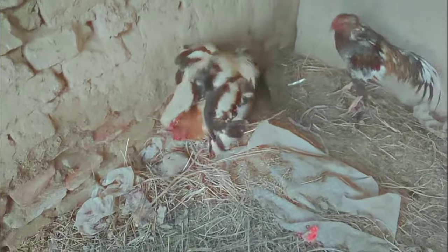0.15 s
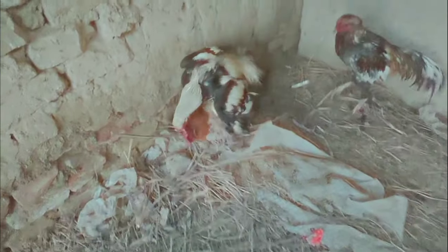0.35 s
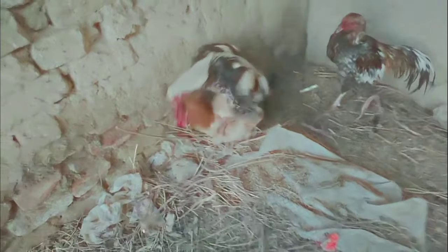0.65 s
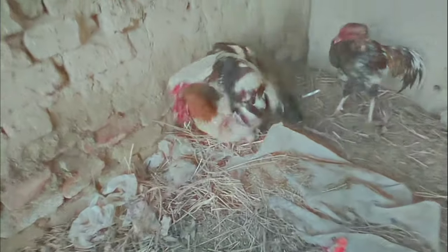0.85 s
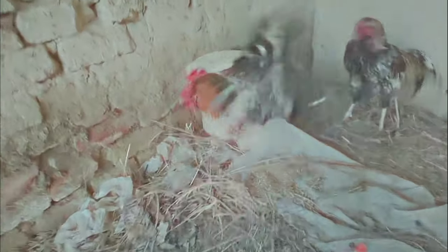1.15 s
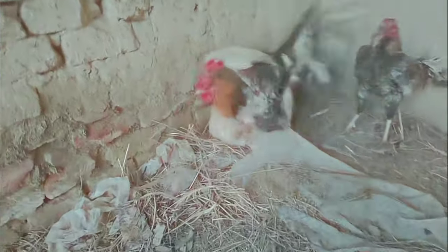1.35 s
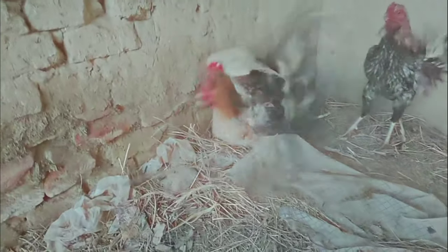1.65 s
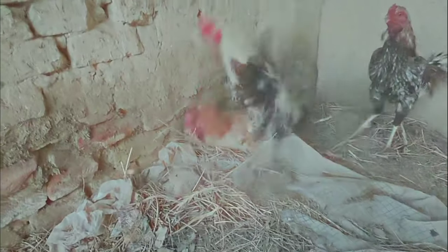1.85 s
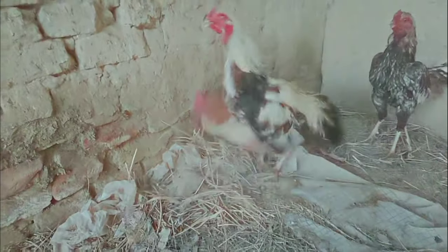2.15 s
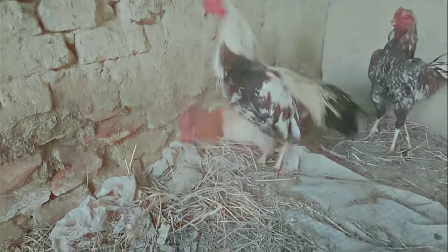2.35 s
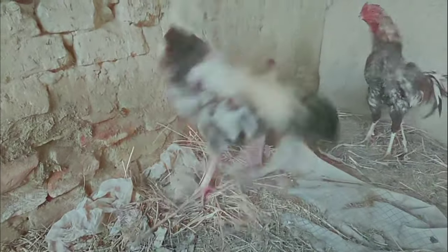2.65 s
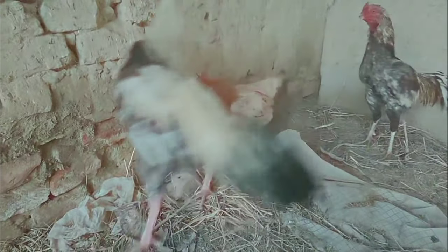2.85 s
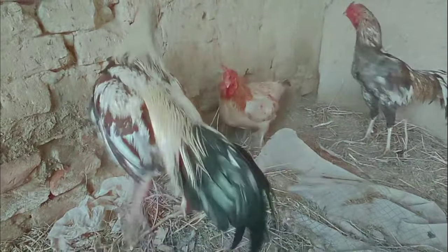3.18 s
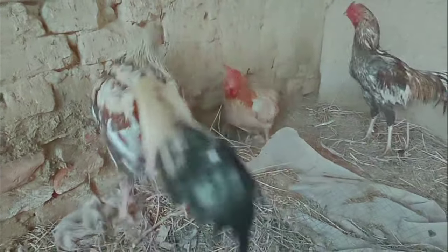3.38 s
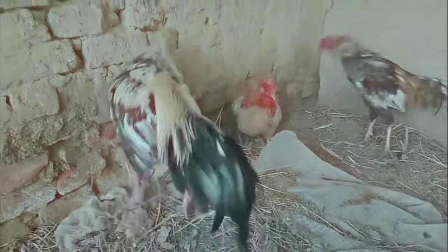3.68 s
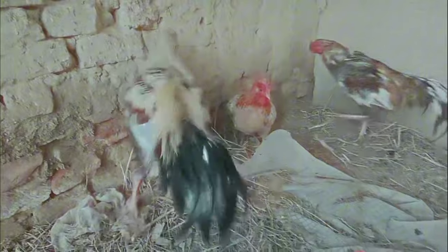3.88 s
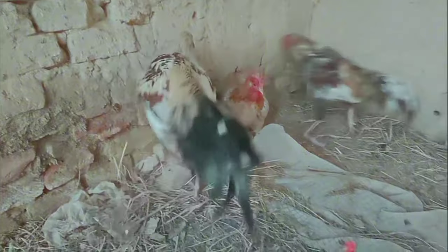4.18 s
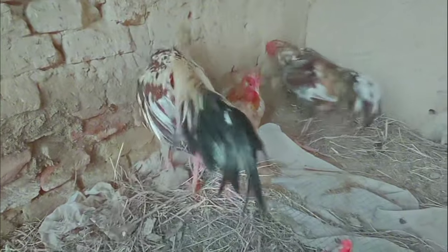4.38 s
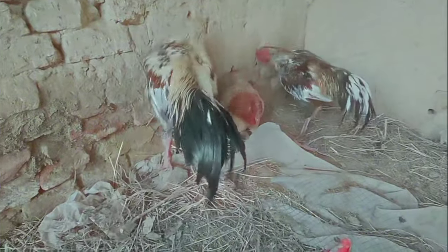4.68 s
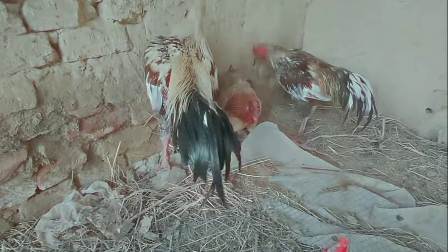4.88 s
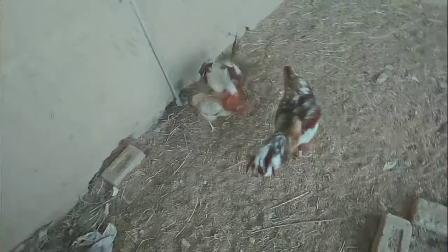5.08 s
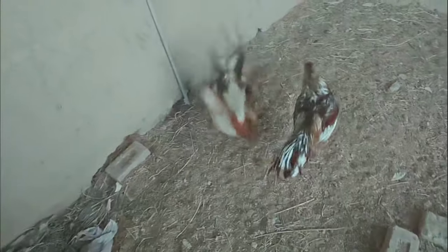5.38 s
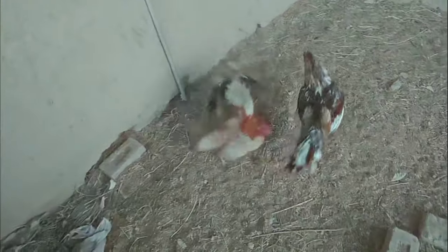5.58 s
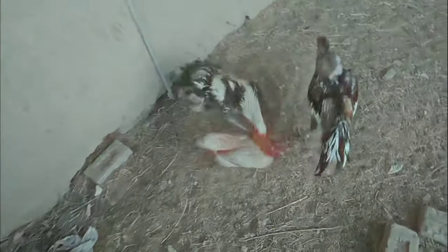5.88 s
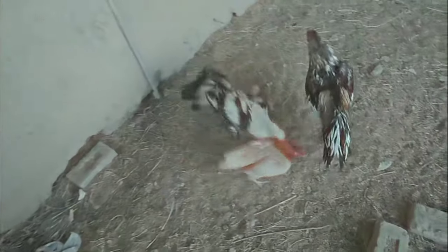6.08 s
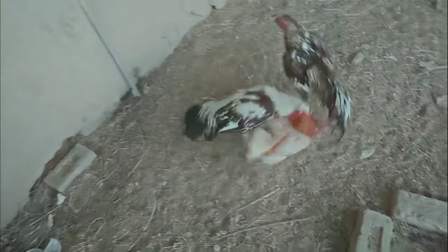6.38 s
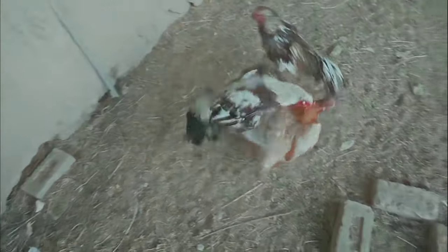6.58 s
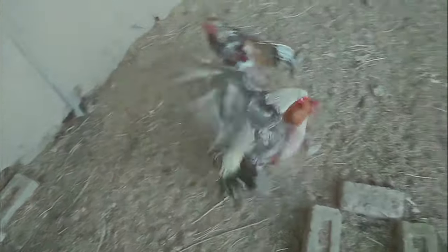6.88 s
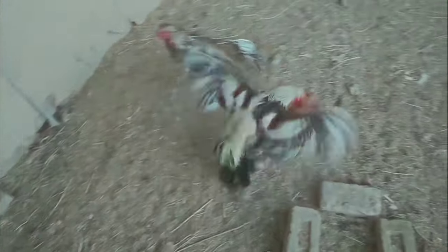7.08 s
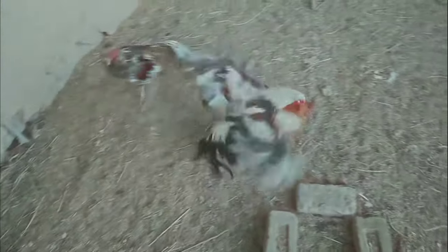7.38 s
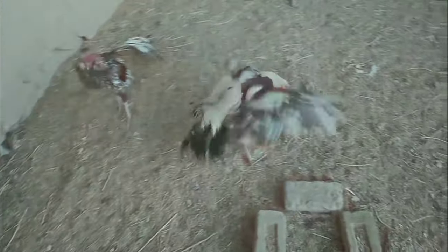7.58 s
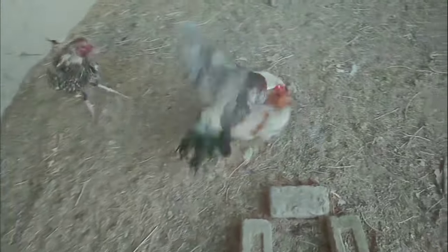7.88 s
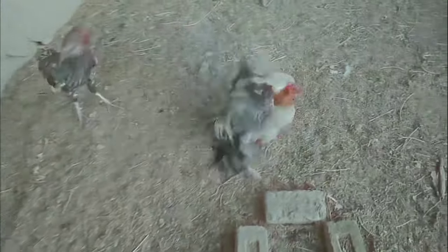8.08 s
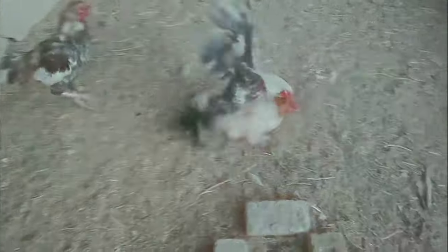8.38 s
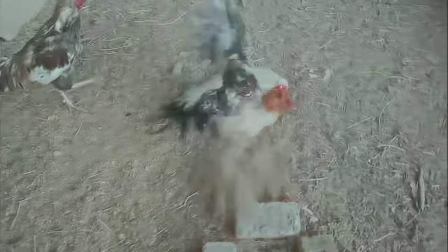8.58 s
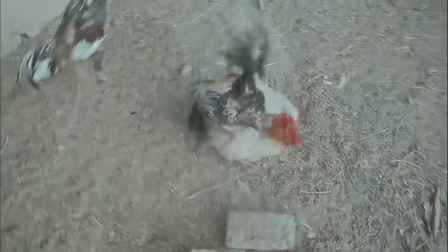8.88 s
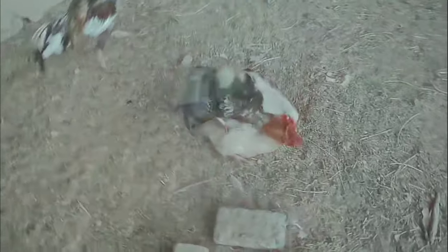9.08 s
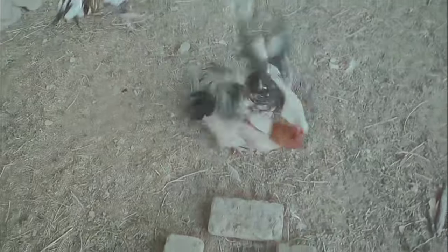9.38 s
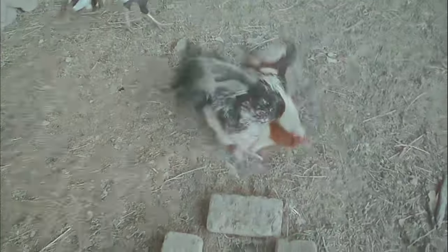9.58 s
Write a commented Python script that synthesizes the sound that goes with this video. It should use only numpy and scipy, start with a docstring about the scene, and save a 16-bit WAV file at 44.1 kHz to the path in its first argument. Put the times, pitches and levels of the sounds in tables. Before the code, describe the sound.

Chickens scuffle in straw with wing slaps and low clucks, followed by a hen's harsh squawks and more flapping.

```python
"""A rooster treads a hen on straw and sacking in a walled pen, then clucks and croons.
After a short silence a hen squawks and cries under beating wings in a bare yard.
The voices are shaky harmonics shaped by throat and beak; the hen's break into period doubling.
Straw and feathers are crackling noise, landings are low thuds, and something hollow is knocked.
A small microphone with a sharp treble resonance colours every rustle."""
import sys
import numpy as np
from scipy import signal
from scipy.fft import rfft, irfft, next_fast_len
from scipy.io import wavfile
from scipy.ndimage import uniform_filter1d

SR = 44100
rng = np.random.default_rng(int(sys.argv[2]) if len(sys.argv) > 2 else 0)


def transcribe(u):
    """Save the signal u as a 16-bit wav file named by the first command-line argument.

    u: samples, shape (n,) or (channels, n), limited to [-1, 1]; the rate is SR.
    q: integer samples, one column per channel.
    """
    v = np.clip(np.atleast_2d(u).T, -1, 1)
    q = np.round(v * 32767).astype(np.int16)
    wavfile.write(sys.argv[1], SR, q)


N = 429534
PEN_END_S, YARD_START_S = 4.972, 5.134

# The tone of straw and feathers. Each row: frequency in Hz, level in dB.
RUSTLE_SPECTRUM = [(120, -19.5), (200, -12), (800, -8.5), (1500, -9.5), (2500, -9), (4000, -11),
                   (8000, -6.5), (16000, -15)]


def amp(db):
    """Decibels to gain."""
    return 10 ** (np.asarray(db) / 20)


def unit_rms(x):
    """Scales to rms 1."""
    return x / np.sqrt(np.mean(x ** 2) + 1e-20)


def curve_at(points, hz):
    """Reads a curve on a log-frequency axis."""
    f, value = np.transpose(points)
    return np.interp(np.log(hz + 1), np.log(f + 1), value)


def colour(x, spectrum):
    """Filters by a spectrum and scales to rms 1."""
    size = next_fast_len(len(x))
    gain = amp(curve_at(spectrum, np.fft.rfftfreq(size, 1 / SR)))
    return unit_rms(irfft(rfft(x, size) * gain, size)[:len(x)])


def wander(count, hz):
    """Smooth random drift of rms 1, up to about the given rate."""
    width = int(SR / hz / 2)
    return unit_rms(uniform_filter1d(uniform_filter1d(rng.standard_normal(count), width), width))


def envelopes(rows):
    """Turns breakpoints, led by their time in seconds, into one curve per column."""
    s, *values = np.transpose(rows)
    t = np.arange(s[0], s[-1], 1 / SR)
    return [np.interp(t, s, column) for column in values]


def swells(t, peak_s, db, rise_s, fall_s):
    """One rounded gain curve per event, 20 dB down at its rise and fall times."""
    age = t - peak_s[:, None]
    distance = np.where(age < 0, -age / np.reshape(rise_s, (-1, 1)), age / np.reshape(fall_s, (-1, 1)))
    return amp(db[:, None] - 20 * distance ** 1.4)


def mids(x):
    """The body of a rustle, under its hiss."""
    return signal.lfilter(*signal.butter(1, [250, 4000], "band", fs=SR), x)


def straw_crackle(grains_per_s=900):
    """Tiny scrapes over soft noise, fluttering in level."""
    grains = rng.standard_normal(N) * amp(0.89 * np.minimum(rng.exponential(1, N), 3))
    grains *= rng.random(N) < grains_per_s / SR
    scrape = rng.standard_normal(40) * np.exp(-np.arange(40) / 9)
    crackle = 0.53 * unit_rms(np.convolve(grains, scrape, "same")) + 0.9 * rng.standard_normal(N)
    return colour(crackle * amp(1.63 * wander(N, 54)), RUSTLE_SPECTRUM)


def scuffle():
    """Straw, sacking and feathers rustle, wings push lumpy low air, and one squawk gets its hiss."""
    # The steady shuffling. Each row: time in seconds, rustle in dB, low air in dB.
    shuffling = [(0, -60.5, -74), (.55, -65.5, -74), (1.15, -61, -63.5), (1.4, -48, -52.5),
                 (1.75, -51.5, -55), (2.2, -52, -61), (2.55, -72, -72), (3.1, -61.5, -84), (3.9, -66, -73),
                 (4.6, -65.5, -68), (4.78, -103, -78), (5.14, -56.5, -78.5), (6.3, -60, -69),
                 (6.85, -52.5, -64.5), (7.3, -52, -62), (8.4, -55, -59), (8.93, -61, -67.5),
                 (9.02, -69.5, -87), (9.3, -62.5, -62), (9.74, -69, -78)]
    # Swishes of feathers and sacking, and at 5.42 s the breathy hiss of the hen's squawk. Each row:
    # peak time in seconds, level in dB, rise and fall in seconds, body against treble in dB.
    swishes = [(.21, -66, 0.028, 0.088, -4), (.77, -64, 0.076, 0.015, -11), (1.07, -55, 0.035, 0.084, 4),
               (1.26, -51, .08, .08, 3), (1.44, -39, 0.056, 0.013, -5.5), (1.55, -47.5, 0.048, 0.064, -2),
               (1.688, -39.5, 0.025, 0.048, 2), (1.85, -52, 0.14, 0.028, 4.5),
               (2.099, -37, 0.014, .05, -0.5), (2.31, -50.5, 0.043, 0.38, 2.5),
               (2.65, -50, 0.036, 0.071, 2.5), (2.85, -49, 0.048, 0.077, -12), (2.94, -55.5, 0.02, 0.11, 4),
               (3.09, -57, 0.053, 0.058, -2), (3.2, -43.5, 0.15, 0.095, -9), (3.32, -39, 0.034, 0.049, -16),
               (3.385, -40, 0.069, 0.14, -9.5), (3.64, -43, 0.075, 0.044, -11), (3.8, -54, 0.11, .1, -15),
               (3.91, -51.5, 0.2, .12, -0.5), (4.085, -42, 0.061, 0.064, -10), (4.2, -55, 0.028, 0.035, -3),
               (4.32, -48, 0.078, 0.17, -4.5), (4.5, -54, .1, 0.16, -3), (4.64, -51.5, 0.098, 0.091, -3),
               (5.42, -34, 0.037, .05, -11), (5.535, -41, 0.027, 0.032, -1), (5.84, -56, 0.024, 0.017, -2),
               (6.07, -46, 0.08, 0.093, -18), (6.8, -69, .05, 0.041, -4), (6.92, -54, 0.014, .04, 11),
               (7.04, -46, 0.069, .04, 2), (7.34, -59, 0.022, .1, -3), (8.01, -52, 0.071, 0.074, -4.5),
               (8.12, -43.5, .02, 0.028, -11), (8.2, -56, 0.023, .1, -8), (8.49, -52, 0.036, 0.055, 5.5),
               (8.6, -53.5, .06, .06, 0), (8.86, -57.5, 0.055, 0.11, -11), (9.22, -54, 0.045, 0.16, -3.5),
               (9.43, -50, 0.032, 0.034, 2), (9.5, -53.5, 0.018, 0.11, -17)]
    # Pushes of air from the wings. Each row: peak time in seconds, level in dB.
    gusts = [(.21, -80), (.57, -69), (1.4, -52), (1.52, -53), (1.66, -59), (1.95, -54), (2.12, -62),
             (2.66, -64), (4.5, -66), (4.64, -68), (5.14, -54), (5.42, -51), (5.535, -53), (5.84, -62),
             (5.95, -59), (6.24, -48.5), (6.7, -58), (6.8, -60), (6.94, -50), (7.06, -49), (7.34, -65),
             (7.8, -72), (8.01, -56), (8.12, -56), (8.2, -69), (8.57, -52), (8.68, -56), (9.22, -67),
             (9.43, -59)]
    # The tone of that air. Each row: frequency in Hz, level in dB.
    air_spectrum = [(15, -43), (25, -16.5), (54, -0.5), (92, -5), (124, -2.5), (248, -7.5), (277, -10),
                    (500, -12), (650, -41.5), (1100, -120)]
    t = np.arange(0, N, 64) / SR
    s, rustle_db, air_db = np.transpose(shuffling)
    *swish_shape, body_db = np.transpose(swishes)
    bed = amp(np.interp(t, s, rustle_db))
    swish = swells(t, *swish_shape)
    treble = bed + swish.sum(axis=0)
    body = bed * amp(1.5) + amp(np.clip(body_db, -15, 10)) @ swish
    gust = swells(t, *np.transpose(gusts), rise_s=0.046, fall_s=0.07)
    low = amp(np.interp(t, s, air_db)) + gust.sum(axis=0)
    treble, body, low = (np.interp(np.arange(N) / SR, t, gain) for gain in (treble, body, low))
    rustle = straw_crackle()
    air = colour(rng.standard_normal(N) * amp(4 * wander(N, 16)), air_spectrum)
    return treble * rustle + (body - treble) * mids(rustle) + low * air


def hiss(level_db=-67):
    """A faint steady hiss with a soft low end."""
    # Its tone. Each row: frequency in Hz, level in dB.
    spectrum = [(18, -36), (30, -11.5), (80, -5), (226, -19), (540, -14.5), (1200, -26), (4000, -27.5),
                (16000, -24.5)]
    return amp(level_db) * colour(rng.standard_normal(N), spectrum)


def wing_slaps():
    """Bursts of feather and straw noise, each led by a dry snap."""
    # Slaps, scratches and snaps. Each row: time in seconds, level in dB, mids against treble in dB,
    # t60 in seconds, snap in dB.
    slaps = [(0.1989, -40.5, 10.5, 0.1, -3.5), (0.411, -49, 7, 0.091, -6), (1.1884, -34, 9.5, 0.063, -14),
             (1.3384, -28.5, 6.5, 0.12, -3), (1.4046, -24, 2.5, 0.056, -0.5), (1.428, -25, 2, 0.081, 0),
             (1.4711, -20, 2, 0.053, 1), (1.523, -25, 0, 0.21, -9), (1.5537, -29, -6, 0.083, 3),
             (1.6164, -30, 6.5, 0.057, -1), (1.664, -31, 5.5, 0.15, -11), (1.755, -33, 7, 0.098, -12),
             (1.9061, -29.5, 7, 0.083, -7), (2.0936, -21.5, 2.5, 0.1, -8), (2.6236, -40, 14, 0.08, -1),
             (2.8259, -24.5, -13, 0.13, -5), (3.5934, -29.5, -19, 0.076, 3), (3.8596, -38, 15.5, 0.052, -1),
             (4.0743, -28, -10, 0.17, -9), (5.5167, -23, -5, 0.075, -6), (6.9084, -25, 7, 0.088, -8),
             (7.319, -28.5, -1, 0.11, -5), (7.9922, -23, -2, 0.078, 7), (8.113, -21.5, 0, 0.062, -10),
             (8.1976, -25, -14, 0.15, -6), (8.2606, -28, -4, 0.067, 1), (8.3938, -27, -6.5, 0.085, 9),
             (8.53, -29, 6.5, 0.06, 3), (8.5753, -25, -19, 0.049, 9), (8.6496, -31, 0, 0.15, -8),
             (8.7638, -53, -13, 0.099, -6), (9.413, -29, 4.5, 0.086, -6), (9.4904, -40, -1, 0.22, -15)]
    t, snap_s = np.arange(round(.2 * SR)) / SR, .002
    for s, db, mids_db, t60, snap_db in slaps:
        burst = colour(rng.standard_normal(len(t)), RUSTLE_SPECTRUM)
        burst += (amp(mids_db) - 1) * mids(burst)
        decay = 0.32 * np.minimum(t / 0.0044, 1) * amp(-60 * t / t60)
        snap = 0.24 * amp(snap_db - 60 * abs(t - snap_s) / 0.0047)
        yield s - snap_s, amp(db) * burst * (decay + snap)


def hollow_knocks():
    """Something hollow is knocked: a few short modes start together."""
    # The knocks. Each row: start in seconds, peak in dB.
    knocks = [(0.2, -33.5), (0.413, -45), (0.562, -50), (0.914, -46.5), (1.058, -40.5)]
    # The hollow body's modes. Each row: frequency in Hz, level in dB, t60 in seconds.
    modes = [(330, -6, .04), (635, -4, .04), (970, -3, .045), (1383, -2, .05), (1570, -3, .05),
             (1803, -1, .045), (2450, -8, .04), (3000, -8, .04)]
    t = np.arange(round(.15 * SR)) / SR
    ring = sum(amp(db - 60 * t / t60) * np.sin(2 * np.pi * hz * t) for hz, db, t60 in modes)
    for s, db in knocks:
        yield s, amp(db) * ring / abs(ring).max()


def landing_thuds():
    """Feet and bodies land on earth: damped low pushes that sag in pitch."""
    # The landings. Each row: start in seconds, level in dB, nominal pitch in Hz, t60 in seconds.
    landings = [(1.339, -44, 96.9, 0.16), (1.369, -39, 132, 0.14), (2.09, -56, 192, 0.16),
                (6.226, -36.5, 118, 0.2), (6.898, -53, 130, 0.17), (7.6, -46.5, 180, 0.26),
                (8.522, -41.5, 214, 0.2), (8.657, -43, 109, 0.17)]
    t = np.arange(round(.3 * SR)) / SR
    attack = np.minimum(t / 0.0025, 1)
    for s, db, hz, t60 in landings:
        cycles = hz * (.8 * t + 0.011 * (1 - np.exp(-t / 0.012)))
        yield s, amp(db - 60 * t / t60) * np.sin(2 * np.pi * cycles) * attack


def harmonics(hz, jitter, throat, top_hz, tilt_db=0, flicker_db=4.5, flicker_hz=40,
              beak_hz=None, shares_db=None):
    """Harmonics of a shaky pitch, each weighted by throat and beak and flickering in strength."""
    cycles = np.cumsum(hz * (1 + jitter * wander(len(hz), 226))) / SR
    orders = np.arange(1, int(top_hz / hz.max()))[:, None]
    partial_hz = orders * hz
    db = curve_at(throat, partial_hz) + tilt_db * np.log2(partial_hz / 1500)
    if beak_hz is not None:
        db += 9 * np.exp(-(np.log2(partial_hz / beak_hz) / .3) ** 2)
    gain = amp(db + flicker_db * np.array([wander(len(hz), flicker_hz) for _ in orders]))
    gain /= np.sqrt((gain ** 2).sum(axis=0))
    if shares_db:  # the second partial and the top band get levels of their own
        second_db, high_db = shares_db
        high = gain * np.clip((partial_hz - 3000) / 300, 0, 1)
        gain = gain - high + high * amp(high_db) / np.sqrt((high ** 2).sum(axis=0))
        gain[1] = amp(second_db)
    return np.sqrt(2) * (gain * np.cos(2 * np.pi * orders * cycles + orders ** 2)).sum(axis=0)


def rooster_voice(rows, throat, hoarseness):
    """Low pulses through a nearly closed beak, shakier when hoarse."""
    effort_db, hz = envelopes(rows)
    voice = harmonics(hz, 0.194 * hoarseness, throat, top_hz=4000, flicker_hz=30)
    return amp(effort_db) * voice * signal.windows.tukey(len(hz), .06)


def sharp_clucks():
    """The rooster's voice swells and dies quickly, bending up as it fades."""
    # The clucks. Each row: start, rise and fall in seconds, peak effort in dB, pitch in Hz.
    clucks = [(2.308, 0.029, .085, -35.5, 310), (2.385, 0.033, 0.036, -40, 334.3),
              (2.605, 0.026, 0.065, -33.5, 328), (2.735, .014, 0.028, -40.5, 345)]
    # His throat in a sharp cluck. Each row: frequency in Hz, gain in dB.
    throat = [(200, -46), (330, -11), (640, 7.5), (970, 1.5), (1300, -4), (1800, -16), (3000, -12.5),
              (4500, -35)]
    for s, rise, fall, db, hz in clucks:
        rows = [(s, db - 24, hz), (s + rise, db, hz), (s + rise + fall, db - 28, 1.02 * hz)]
        yield s, rooster_voice(rows, throat, hoarseness=0.37)


def croon():
    """The rooster holds one low, wavering note."""
    # Its contour. Each row: time in seconds, effort in dB, pitch in Hz.
    contour = [(2.757, -41.5, 179), (2.821, -46, 185.7), (2.875, -49.5, 158.1), (2.923, -53, 165.5),
               (3.017, -49.5, 158), (3.037, -48, 171.5), (3.133, -55.5, 147), (3.193, -54, 164.3),
               (3.309, -50, 170.7), (3.339, -55, 149), (3.36, -56, 163.7)]
    # His throat while crooning. Each row: frequency in Hz, gain in dB.
    throat = [(120, -0.5), (170, -4.5), (330, -14), (500, -3.5), (660, -1), (820, -15.5), (980, -14.5),
              (1300, -25.5), (3000, -21.5)]
    yield contour[0][0], rooster_voice(contour, throat, hoarseness=0.132)


def soft_clucks():
    """Short puffs of the rooster's voice, rough at first and settling on their pitch."""
    # The run of clucks. Each row: start in seconds, level in dB, pitch in Hz, tilt in dB per octave.
    clucks = [(3.56, -56, 189.7, 6), (3.71, -48, 181.5, 3), (3.815, -48, 193.5, 10.5),
              (3.942, -48, 189.4, 7.5), (4.062, -49.5, 179, 3.5), (4.178, -49, 182, 1.5),
              (4.292, -49, 237, -2), (4.41, -48.5, 241, 4.5), (4.52, -50, 232, 8), (4.635, -48, 231.8, 4),
              (4.762, -52.5, 245.3, 5.5), (5.255, -51.5, 241, -0.5)]
    # His throat in a muffled cluck. Each row: frequency in Hz, gain in dB.
    throat = [(150, -6.5), (250, -16), (370, 8.5), (490, 1), (720, -4.5), (1000, -15.5), (1400, -49),
              (2500, -29)]
    rise_s = .016
    age = np.arange(round(.12 * SR)) / SR / rise_s
    jitter = 0.066 + 0.212 * np.exp(-age)
    for s, db, hz, tilt_db in clucks:
        voice = harmonics(np.full(len(age), hz), jitter, throat, 2900, tilt_db, flicker_db=7)
        yield s, amp(db) * voice * age * np.exp(1 - age)


def hen_voice(rows, roughness):
    """A clear tone gives way to period doubling and breath; roughness maps progress (0-1) to the blend."""
    # Her throat in a clear note. Each row: frequency in Hz, gain in dB.
    clear_throat = [(400, -10.5), (720, 2), (1100, -5), (1430, -3.5), (2150, -12), (2850, -9.5),
                    (3600, -13), (4300, -13), (5000, -11.5), (5800, -21.5), (7200, -25.5), (12000, -60.5)]
    # Her throat when hoarse. Each row: frequency in Hz, gain in dB.
    hoarse_throat = [(300, -31), (700, -5.5), (1100, -2), (1600, -1.5), (2300, -5.5), (2900, -7),
                     (3600, -14), (5000, -17), (6500, -15), (9000, -23), (14000, -39.5)]
    effort_db, hz, beak_hz, tilt_db, *shares_db = envelopes(rows)
    tilt_db, count = np.clip(tilt_db, -8, 8), len(hz)
    clear = harmonics(hz, .003, clear_throat, 11000, tilt_db, flicker_db=3.2, flicker_hz=11,
                      beak_hz=beak_hz, shares_db=shares_db)
    unsteady_hz = hz * (1 + .045 * wander(count, 26))
    whole = harmonics(unsteady_hz, .019, hoarse_throat, 13000, tilt_db, beak_hz=beak_hz)
    octave_down = harmonics(unsteady_hz / 2, .026, hoarse_throat, 13000, tilt_db, beak_hz=beak_hz)
    breath = colour(rng.standard_normal(count), hoarse_throat)
    hoarse = (.72 * whole + .65 * octave_down + .25 * breath) * amp(2.5 * wander(count, 120))
    rough = roughness(np.linspace(0, 1, count))
    smooth = (1 - rough) ** 2
    voice = (smooth * clear + rough * hoarse) / np.hypot(smooth, rough)
    return amp(effort_db) * voice * signal.windows.tukey(count, .12)


def squawks():
    """The hen starts dull and partly clear, scoops up, breaks up, and sags as the beak closes."""
    # The squawks. Each row: start, rise, hold and fall in seconds, peak effort in dB,
    # pitch and beak resonance in Hz, tilt in dB per octave.
    calls = [(5.135, 0.0017, 0.0029, .06, -24.5, 710, 1410, 3.5),
             (5.345, .075, .015, .06, -20.5, 801, 1870, 7),
             (5.648, 0.092, .015, 0.044, -29.5, 737, 1587, 3.5),
             (5.895, 0.055, 0.014, .045, -27, 775, 2410, 6.5),
             (6.475, 0.024, 0.0085, .04, -35.5, 555, 1330, 3), (6.535, 0.024, .015, .07, -29, 719, 2740, 1),
             (6.712, .035, 0.045, .055, -28, 744, 2080, 1), (6.93, 0.039, 0.038, .06, -26, 777, 1660, 3.5),
             (7.36, 0.055, .02, .045, -36.5, 844, 2380, 2),
             (7.475, 0.021, 0.0095, .055, -28, 744, 2880, 2.5),
             (7.615, 0.029, 0.019, .02, -40, 690, 1150, -6), (7.668, .05, .012, .06, -25, 792.6, 2220, 4.5)]
    for s, rise, hold, fall, db, hz, beak_hz, tilt_db in calls:
        rows = [(s, db - 27, .82 * hz, beak_hz, tilt_db - 9.5),
                (s + rise / 4, db - 12, .91 * hz, beak_hz, tilt_db - 4.75),
                (s + rise, db, hz, beak_hz, tilt_db),
                (s + rise + hold, db, .97 * hz, .94 * beak_hz, tilt_db),
                (s + rise + hold + fall, db - 34, .88 * hz, .88 * beak_hz, tilt_db)]
        yield s, hen_voice(rows, lambda progress: np.interp(progress, [0, .12, .25], [.5, .6, .9]))


def cries(attack_s=0.037, release_s=0.073):
    """The hen's voice catches and scoops up, holds a clear note that settles, and ends in a croak."""
    # The held cries. Each row: start and length in seconds, effort in dB, first and target pitch in Hz,
    # settling time in seconds, beak resonance in Hz, tilt in dB per octave,
    # shares in dB of the second partial and of the partials above about 3 kHz.
    calls = [(6.005, 0.44, -29.5, 675.5, 728.6, 0.097, 3370, -0.4, -17, -8),
             (7.815, 0.092, -33.5, 558, 548, 0.22, 2640, -0.5, 1, -31),
             (7.927, .4, -31, 725.6, 675, .5, 3000, 2.5, -5, -12.5)]
    for s, length, db, first_hz, target_hz, settle, beak_hz, tilt_db, second_db, high_db in calls:
        t, held = np.linspace(0, length, 60), length - release_s
        effort_db = db + np.interp(t, [0, attack_s, max(held, attack_s), length], [-14, 0, 0, -24])
        note_hz = target_hz + (first_hz - target_hz) * np.exp(-t / settle)
        scoop = 1 - .3 * np.exp(-(t / 0.016) ** 2 / 2)
        droop = 1 - 0.0783 * np.clip((t - max(held, .07) + 0.0097) / release_s, 0, 1)
        bright_db = high_db + 8 * np.exp(-t / .05)  # the top starts strong and softens
        curves = s + t, effort_db, note_hz * scoop * droop, beak_hz, tilt_db, second_db, bright_db

        def roughness(progress):
            age = progress * length
            catch = np.interp(age, [0, .026, .05, .13], [.5, .4, .12, .04])
            croak = .65 * np.clip((age - max(held, .06)) / 0.012, 0, 1)
            return np.maximum(catch, croak)

        yield s, hen_voice(np.column_stack(np.broadcast_arrays(*curves)), roughness)


def reflections(x, decays):
    """Sparse echoes of random sign, each band dying at its own speed."""
    taps = np.zeros(SR // 2)
    slots = np.arange(260, len(taps) - 20, 20)
    taps[slots + rng.integers(0, 20, len(slots))] = rng.choice([-1., 1.], len(slots))
    hz, t, bands = signal.stft(taps, SR, nperseg=256)
    tail = signal.istft(bands * amp(-60 * t / curve_at(decays, hz)[:, None]), SR, nperseg=256)[1]
    return signal.fftconvolve(x, tail / np.linalg.norm(tail))[:N]


def scene():
    """Calls and blows echo in the pen, then in the yard; scuffle and hiss lie dry under them."""
    # The ring of the pen's walls. Each row: frequency in Hz, t60 in seconds.
    pen_decays = [(300, 0.2), (1500, 0.13), (4000, 0.11), (10000, 0.03)]
    # The ring of the yard. Each row: frequency in Hz, t60 in seconds.
    yard_decays = [(300, 0.14), (1500, 0.23), (4000, 0.17), (10000, 0.12)]
    direct = np.zeros(N)
    for source in (croon, squawks, cries, sharp_clucks, soft_clucks,
                   wing_slaps, landing_thuds, hollow_knocks):
        for s, sound in source():
            part = direct[round(s * SR):][:len(sound)]
            part += sound[:len(part)]
    background = hiss()
    in_pen = np.arange(N) < YARD_START_S * SR
    pen = amp(-12.5) * reflections(direct * in_pen, pen_decays)
    yard = amp(-7.5) * reflections(direct * ~in_pen, yard_decays)
    return (direct + pen + yard + scuffle() + background)[None]


def record(dry, top_hz=15850):
    """Microphone colour and low cut, silence between the two places, then the band limit."""
    # The small microphone's resonant treble. Each row: frequency in Hz, gain in dB.
    mic_response = [(4300, 1.5), (5100, 3.5), (5800, 9.5), (6400, 4), (7000, -8), (8600, -3), (9900, 0.5),
                    (11200, -3), (15000, 8), (16000, 8)]
    hz, t = np.linspace(0, SR / 2, 513), np.arange(N) / SR
    mic = signal.firwin2(401, hz, amp(curve_at(mic_response, hz)), fs=SR)
    heard = signal.oaconvolve(dry, mic[None], "same")
    heard = signal.lfilter(*signal.butter(2, 48, "high", fs=SR), heard)
    gate = np.clip((PEN_END_S - t) / 0.0014, 0, 1) + np.clip((t - YARD_START_S) / 0.00054, 0, 1)
    lowpass = signal.firwin(511, top_hz, window=("kaiser", 9), fs=SR)
    return signal.oaconvolve(heard * gate, lowpass[None], "same")


dry = scene()
out = record(dry)
transcribe(out)
```